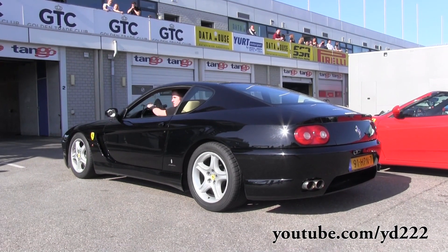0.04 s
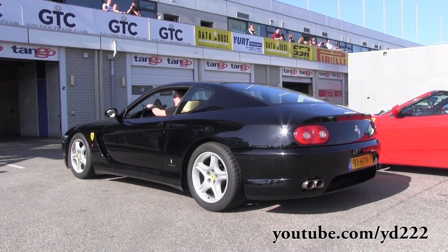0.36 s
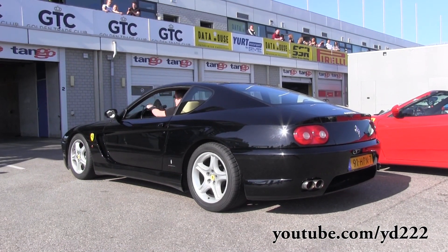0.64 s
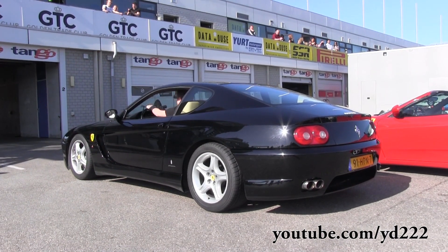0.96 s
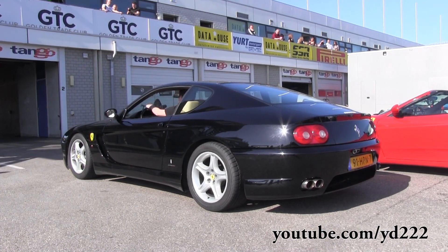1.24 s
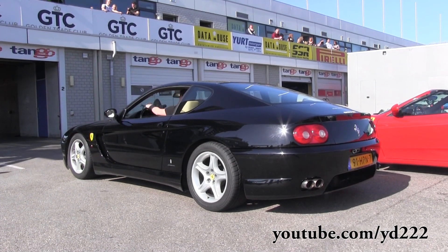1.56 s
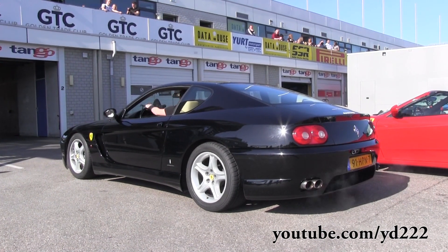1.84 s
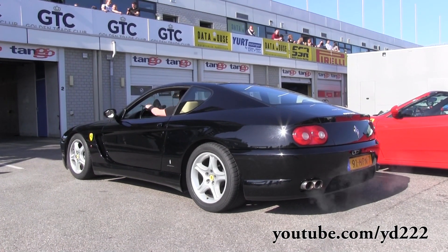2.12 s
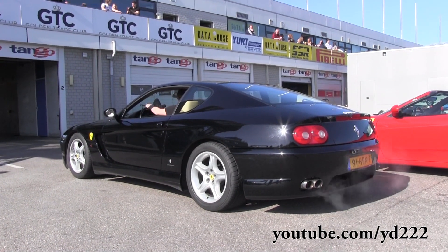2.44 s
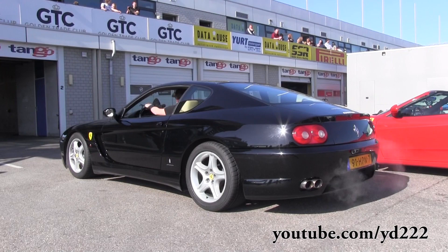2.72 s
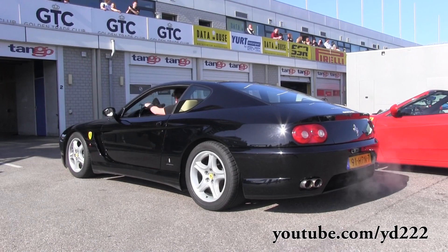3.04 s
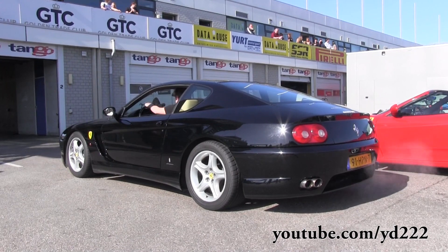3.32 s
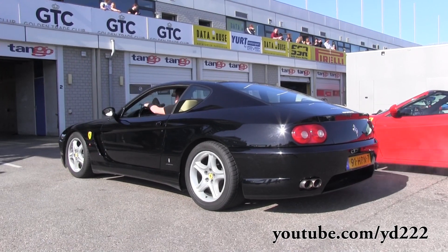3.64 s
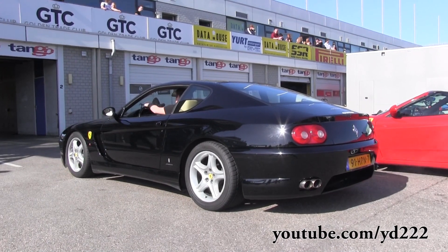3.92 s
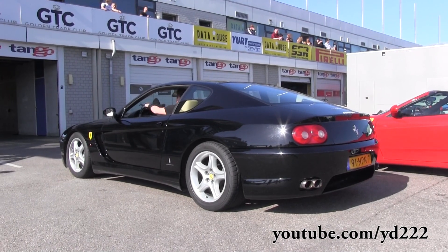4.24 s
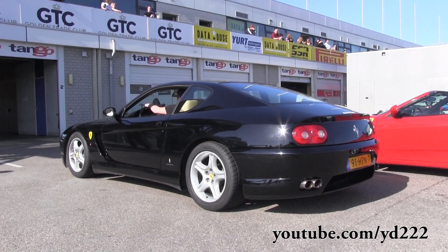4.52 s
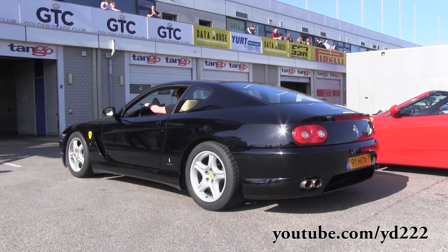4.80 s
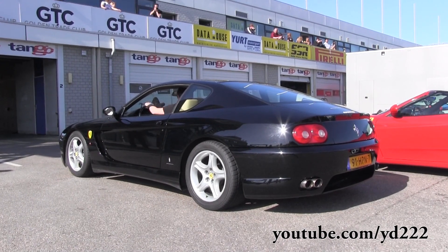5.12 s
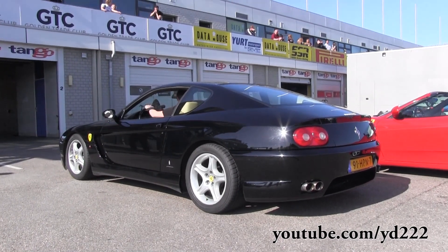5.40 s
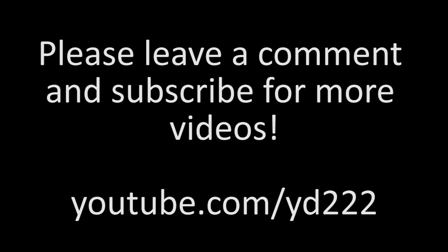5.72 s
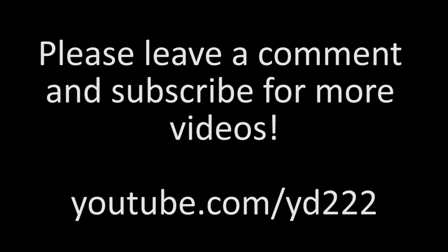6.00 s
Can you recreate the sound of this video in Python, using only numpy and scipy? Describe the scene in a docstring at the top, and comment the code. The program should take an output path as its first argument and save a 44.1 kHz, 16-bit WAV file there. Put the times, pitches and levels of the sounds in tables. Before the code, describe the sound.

A sports car revs once and runs down with exhaust pops, then a closer, lumpy engine idles fast and eases off.

```python
"""A twelve-cylinder sports car is revved once and runs down to idle, rasping and coughing.
Its firings make the exhaust pipe ring, gas rushes out, and unburnt fuel pops in the silencer.
Close by, a lumpy ten-cylinder engine at a fast idle takes over, then eases off and drones.
Both hum in "orders": tones at whole multiples of an engine's cycle or firing rate.
Garage fronts echo, a small double click comes near the end, and the sound stops abruptly."""
import sys
import numpy as np
from scipy import signal
from scipy.fft import rfft, irfft, next_fast_len
from scipy.io import wavfile
from scipy.ndimage import uniform_filter1d, minimum_filter1d, map_coordinates

SR = 44100
rng = np.random.default_rng(int(sys.argv[2]) if len(sys.argv) > 2 else 0)


def persist_wave(psi):
    """Save psi, clipped to +-1, as 16-bit WAV."""
    counts = np.round(np.clip(psi, -1, 1) * 32767).astype(np.int16)
    wavfile.write(sys.argv[1], SR, np.atleast_2d(counts).T)


N = 276066

# How long the echo takes to fade by 60 dB: (frequency [Hz], time [s])
ECHO_FADE = [(100, 0.56), (1000, 0.37), (10000, 0.026)]
# How alike noise is in the two ears: (frequency [Hz], likeness [0-1])
EAR_LIKENESS = [(100, 1), (500, .85), (1000, .82), (2000, .72), (4000, .68), (12000, .7)]
# Two small, hard clicks: (time [s], level [dB])
CLICKS = [(4.923, -38), (4.942, -51)]
# Where each engine sits: (frequency [Hz], left minus right [dB])
LUMPY_SIDE = [(60, -3), (110, -3.5), (200, -3), (380, -3.5), (700, -1), (1290, -1.5), (2380, 1.5),
              (4400, 0.0), (8120, 1), (15000, -2.5)]
CAR_SIDE = [(60, -3), (200, -1.5), (400, -1), (700, -0.5), (1300, 0.5), (2400, 3), (4400, 1.5), (8100, 2),
            (15000, -3)]

# Tone colours, each a list of (frequency [Hz], relative level [dB])
CLICK_COLOUR = [(2500, -28.5), (4200, 2), (6500, -12), (9300, -0.5), (11000, -17.5), (14500, -13.5),
                (16000, -47.5)]
LOADED_COLOUR = [(30, -39.5), (50, -13), (80, -5), (107, -4.5), (135, -2.5), (193, 0.5), (227, -16.5),
                 (260, 0.5), (326, -7), (380, -2.5), (463, -6.5), (680, -31), (900, -32.5), (1300, -67),
                 (2500, -120)]  # the lumpy engine's exhaust, working hard
EASED_COLOUR = [(30, -44.5), (55, -28), (80, -30), (120, -16), (150, -9), (170, -20.5), (205, -7),
                (247, -11), (284, -6), (330, -20.5), (370, -25), (430, -13), (500, -30), (900, -31),
                (1300, -42.5), (2500, -120)]  # the same exhaust, eased off
CHUFF_COLOUR = [(400, -7.5), (600, -2.5), (720, -8.5), (950, -8), (1150, -7), (1300, -11.5), (1580, -11),
                (1660, -9), (1780, -13.5), (1950, -16), (2190, -17), (2600, -20.5), (2820, -17.5),
                (2950, -24.5), (4000, -38), (5500, -61.5), (9000, -120)]  # its gas, middle range
FIZZ_COLOUR = [(2060, -23.5), (3500, 1), (3950, -5), (4280, -2), (4740, -7), (5910, -7.5), (7230, -14),
               (8200, -14), (10700, -20), (14600, -26.5), (15800, -36.5)]  # its gas, treble
BLAST_COLOUR = [(45, -36.5), (90, 0), (150, 0), (300, 3), (420, 1), (600, -5), (850, -30), (2000, -120)]  # the gas a cough throws out
BARK_COLOUR = [(200, -35), (450, -16), (620, -10), (760, -17.5), (900, -15.5), (1200, -14), (1500, -12),
               (2100, -25), (5000, -50.5), (9000, -120)]  # the sports car's silencer
RASP_COLOUR = [(380, -22.5), (650, -9), (770, -8), (900, -7), (1190, -3.5), (1400, -5), (1540, -4),
               (1640, .5), (1760, -5), (1920, -9.5), (2190, -3), (2450, -10.5), (2680, -10), (2820, -4.5),
               (3000, -13.5), (3220, -10), (3900, -15), (4500, -15), (5500, -31), (9000, -120)]  # its exhaust's rough edge
HONK_COLOUR = [(300, -69.5), (800, -26), (1180, -5), (1460, 6), (1750, 1.5), (2100, -6.5), (3200, -38),
               (7000, -120)]  # its pipe mouths with the throttle open
HISS_COLOUR = [(2060, -24), (3500, -11), (4450, -5.5), (4920, -4.5), (6170, -3), (6490, -4.5), (7050, -13),
               (8100, -7.5), (9480, -14), (10700, -12.5), (14600, -24.5), (15200, -26.5), (15800, -32.5)]  # its gas, treble
BURBLE_COLOUR = [(40, -33.5), (90, -10), (140, 4), (300, 3.5), (520, 7), (750, -3.5), (1200, -42),
                 (3000, -120)]  # its gas, bass

# How the lumpy engine runs: (time [s], four-stroke cycle rate [Hz], load [0-1], nearness [dB])
LUMPY_RUN = [(0, 13, 0.86, -15.5), (1.2, 9.5, 1, -19.5), (1.7, 11.6, 0.27, -10.5), (2.0, 11.2, 0.98, -7),
             (2.4, 11.84, 1, -3), (2.7, 12.5, 0.97, 1), (2.9, 12.8, 0.94, 2), (3.25, 13.12, 0.97, 2),
             (3.6, 13.15, 0.99, 0), (3.9, 13.05, 0.94, 1.5), (4.22, 12.85, 0.83, 1),
             (4.35, 12.4, 0.69, 1.5), (4.55, 12.2, .42, 2), (4.68, 11.66, 0.16, 2.5), (4.9, 11.8, 0.05, 1),
             (5.07, 11, 0.11, 2), (5.3, 11.24, 0.05, 2), (5.66, 10.37, 0.05, 3)]
# Its orders: (multiple of the cycle rate, at full load [dB], at half load [dB], eased off [dB])
LUMPY_ORDERS = [(5, -16, -15, -23), (6, -9.5, -20.5, -31), (10, -16, -18, -23.5), (12, -10, -6, -27),
                (14, -10, -20, -7.5), (16, -17.5, -8.5, -11), (20, -9.5, -4, -9), (21, -27, -4, -18),
                (24, -24.5, -11.5, -10), (25, -11.5, -19, -2), (29, -19.5, -23, -17),
                (32, -20.5, -18.5, -20), (36, -11, -22.5, -26), (39, -19, -34.5, -30.5),
                (40, -16.5, -45, -16), (46, -18, -40, -29.5), (57, -26, -40, -34.5)]
# How three of its layers swell and fade: (time [s], relative level [dB])
ORDERS_LEVEL = [(2.95, -6), (3.22, -1)]
BOOM_LEVEL = [(2.5, -34), (2.7, -28), (3.08, -28), (3.3, -17.5), (4.27, -15), (4.38, -30), (4.65, -33),
              (4.9, -39), (5.66, -34)]
GAS_LEVEL = [(2.55, -23), (2.63, -27), (2.95, -25), (3.45, -25.5), (3.55, -26), (4.45, -30), (4.62, -35.5),
             (4.9, -36), (5.35, -37.5), (5.66, -34.5)]
# With each of its surges, one order drones in the silencer:
# (time [s], relative level [dB], half width [s], multiple of the cycle rate)
DRONE_SURGES = [(3.254, -18.5, 0.022, 15), (3.507, -17, 0.023, 15), (3.737, -17, 0.017, 15),
                (4.333, -14.5, 0.041, 13), (4.448, -20, 0.025, 13), (4.524, -16.5, 0.032, 20),
                (4.577, -19, 0.03, 13), (4.713, -14, 0.025, 15), (4.806, -16.5, 0.021, 15),
                (4.945, -8.5, 0.03, 15), (5.054, -15, 0.018, 15), (5.131, -15.5, 0.04, 15),
                (5.236, -15, 0.016, 15), (5.384, -17.5, 0.026, 15), (5.574, -15, 0.015, 15),
                (5.642, -12.5, 0.014, 25)]

# The sports car's coughs: (time [s], boom [dB], half width [s], pitch [Hz], blast [dB])
FUEL_COUGHS = [(0.018, -17, 0.025, 346, -23), (.085, -24.5, 0.031, 166, -25),
               (.155, -24, 0.026, 187, -19.5), (0.474, -18, 0.0058, 407, -14.5),
               (0.551, -10, 0.012, 562, -16.5), (0.605, -26.5, 0.009, 290, -26),
               (0.634, -21, 0.02, 300, -25), (0.724, -19.5, 0.0086, 220, -24),
               (1.137, -17, 0.0062, 300, -12.5), (1.147, -16, 0.0057, 272, -12.5),
               (2.601, -19, 0.015, 85.5, -13), (2.671, -15, 0.011, 278, -17.5),
               (2.703, -18, 0.012, 92, -21), (2.755, -22, .005, 200, -18), (2.791, -25, 0.0046, 78, -19),
               (3.007, -26, 0.0087, 101, -14)]
# Its speed: (time [s], firing rate of one bank of six cylinders [Hz])
CAR_SPEED = [(0, 113.7), (.1, 112.1), (.19, 120), (.26, 137.1), (.4, 171.4), (.46, 182.4), (.51, 179.4),
             (.59, 180.6), (.67, 175.7), (.75, 166.3), (.88, 154.6), (1.04, 141.1), (1.2, 128),
             (1.38, 115.7), (1.66, 97.1), (1.87, 83.3), (2.23, 62.8), (2.5, 48.5), (2.6, 46.8)]
# One quick press of the pedal: (time [s], throttle opening [0-1])
CAR_THROTTLE = [(0, 0), (.05, 0.46), (.12, 0.83), (.21, 1), (.45, 0.6), (.49, 0)]
# It sinks to a quiet idle: (time [s], gain [dB])
CAR_FADE = [(2.53, 0.5), (2.65, -3.5), (3.0, -12), (3.6, -51.5)]
# Its orders: (multiple of the firing rate, relative level [dB])
CAR_ORDERS = [(1, -1), (2, -2), (3, 0), (4, 1.5), (5, -9.5), (6, -11), (8, -5), (10, -14), (13, -12),
              (14, -13)]
# What full throttle does to those orders: (frequency [Hz], gain [dB])
THROTTLE_BOOST = [(90, -7.6), (150, -3.7), (250, 8), (370, 14.5), (450, 9), (550, 11.5), (680, 7.5),
                  (850, -2.7), (1100, 0), (1500, 7), (2100, -1), (2800, -5)]
# Standing waves, the pitches its pipe likes to ring at: (frequency [Hz], half width [Hz], gain [dB])
PIPE_RESONANCES = [(70.4, 7, -21.2), (101.4, 8, -15.3), (123, 9.6, -24), (178.6, 8, -29),
                   (201.5, 12, -20.3), (256, 13, -28), (294, 14, -25.5), (361.5, 20, -29.2),
                   (468, 16, -20.5), (549, 24, -23), (615, 35, -28.5), (736, 17, -33), (904.5, 26, -21.5),
                   (1190, 90, -31), (1500, 120, -28)]

# Rules: (value at CRUISE_HZ with the throttle shut, added by full throttle, added as speed doubles)
CRUISE_HZ = 120
BARK_RULE_DB, RASP_RULE_DB = (-35, 6, 0.92), (-22.5, 3.5, 2.5)
HISS_RULE_DB, BURBLE_RULE_DB = (-35.5, -1, 3.4), (-27, 4.3, -0.88)
PITCHED_RULE = (.55, .15, .08)  # the share of the rasp that repeats with each firing


def amp(db):
    """Turn decibels into a gain."""
    return 10 ** (np.asarray(db) / 20)


def unit(x):
    """Scale a signal to an average (rms) level of 1."""
    return x / np.sqrt(np.mean(x ** 2) + 1e-20)


def along(points, hz):
    """Look up a (frequency, value) table, sliding between its rows by octaves."""
    freqs, values = np.transpose(points)
    return np.interp(np.log(hz + 1), np.log(freqs + 1), values)


def curves(rows):
    """Turn each column after the time into one value per sample."""
    times, *columns = np.transpose(rows)
    return [np.interp(np.arange(N) / SR, times, column) for column in columns]


def wobble(rate):
    """A smooth random curve through `rate` new values a second."""
    return map_coordinates(rng.standard_normal(int(N * rate / SR) + 4), [np.arange(N) * rate / SR])


def bump(at_s, width_s):
    """A bell-shaped swell of height 1 around a moment."""
    return np.exp(-.5 * np.minimum(((np.arange(N) / SR - at_s) / width_s) ** 2, 200))


def filtered(x, response):
    """Turn each frequency up or down by the gain response(hz)."""
    size = next_fast_len(N + SR // 4)
    return irfft(rfft(x, size) * response(np.fft.rfftfreq(size, 1 / SR)), size)[..., :N]


def placed(x, side):
    """Lean a source left or right, by frequency."""
    return filtered(x, lambda hz: amp(np.array([[.5], [-.5]]) * along(side, hz)))


def ring(x, colour, size=8192):
    """Let x ring a hollow body with this tone colour; the result has level 1."""
    cepstrum = irfft(np.log(amp(along(colour, np.fft.rfftfreq(size, 1 / SR))) + 1e-6))
    cepstrum[1:size // 2] *= 2  # folding it puts the ringing after each pulse, never before
    cepstrum[size // 2 + 1:] = 0
    ringing = irfft(np.exp(rfft(cepstrum)))
    return unit(signal.fftconvolve(x, ringing)[:N])


def rush(colour, flow):
    """Rushing stereo noise of level 1 whose strength follows the flow."""
    def response(hz):
        spread = np.arccos(np.clip(along(EAR_LIKENESS, hz), -1, 1)) / 2
        return amp(along(colour, hz)) * np.array([np.cos(spread), np.sin(spread)])
    mid, side = filtered(flow * rng.standard_normal((2, N)), response)
    return unit(np.array([mid + side, mid - side]))


def puffs(phase, depth_db, flutter_db):
    """Gas flow that swells once per turn of the phase and flutters at random."""
    return amp(depth_db * np.cos(2 * np.pi * phase) + flutter_db * wobble(170))


def order_tone(phase, waver_db, smear, rate):
    """One engine order: a tone of level about 1, unsteady in strength and timing."""
    strength = np.sqrt(2) * amp(waver_db * wobble(rate))
    return strength * np.sin(2 * np.pi * (phase + rng.random()) + smear * wobble(rate))


def garage_echo(x):
    """The garage fronts throw the sound back, the treble dying first."""
    hz, t, noise = signal.stft(rng.standard_normal((2, SR // 2)), SR, nperseg=256)
    tail = signal.istft(noise * amp(-60 * t / along(ECHO_FADE, hz)[:, None]), SR, nperseg=256)[1]
    delayed = np.pad(x.mean(axis=0), (700, 0))  # about 16 ms late
    return signal.fftconvolve(delayed[None], tail / np.linalg.norm(tail[0]), axes=1)[:, :N]


def double_click(fade_s=.065):
    """Two bright bursts of noise that start sharply and die fast."""
    t = np.arange(N) / SR
    strikes = sum(amp(db - 60 * np.abs(t - at) / fade_s) * (t > at) for at, db in CLICKS)
    return strikes * rush(CLICK_COLOUR, 1)


def firings(phase, uneven_db, scatter_db, jitter, cylinders):
    """One slightly mistimed pulse per turn of the phase; each cylinder has its own strength."""
    strength = rng.standard_normal(cylinders)
    turns = np.arange(1, int(phase[-1]))
    chance = rng.standard_normal((len(turns), 2))
    at = np.interp(turns + jitter * chance[:, 0], phase, np.arange(N) - .5).clip(0, N - 2)
    size = amp(uneven_db * strength[turns % cylinders] + scatter_db * chance[:, 1])
    i = at.astype(int)  # each pulse is shared between two samples
    return np.bincount(i, size * (1 - at + i), N) + np.bincount(i + 1, size * (at - i), N)


def silencer_drone(phase):
    """One order hums softly all along, and each surge makes one swell in the silencer."""
    orders = sorted({round(k) for *_, k in DRONE_SURGES})
    tones = {k: order_tone(k * phase, waver_db=.7, smear=.15, rate=20) for k in orders}
    hum = amp(-25.5) * tones[round(DRONE_SURGES[0][3])]
    return hum + sum(amp(db) * bump(at, width) * tones[round(k)] for at, db, width, k in DRONE_SURGES)


def lumpy_gas(phase):
    """Escaping gas chuffs and fizzes; the fizz rises and falls further than the chuff."""
    gas_db, = curves(GAS_LEVEL)
    fizz_db = -47 + 1.24 * (gas_db + 29)
    flow = puffs(5 * phase, depth_db=.4, flutter_db=.4)
    return amp(gas_db) * rush(CHUFF_COLOUR, flow) + amp(fizz_db) * rush(FIZZ_COLOUR, flow)


def lumpy_engine(body_db=-16.5, sag_db=-3.5):
    """Ten uneven cylinders ring an exhaust that booms under load and drones as it eases off."""
    def by_load(full_db, half_db, eased_db):
        return amp(np.interp(load, [0, .5, 1], [eased_db, half_db, full_db]))
    cycle_hz, load, near_db = curves(LUMPY_RUN)
    phase = np.cumsum(cycle_hz * (1 + 0.0017 * wobble(14))) / SR
    boom = amp(curves(BOOM_LEVEL)[0]) * order_tone(8 * phase, waver_db=.7, smear=.06, rate=20)
    drone = silencer_drone(phase)
    orders = sum(by_load(*levels) * order_tone(round(k) * phase, waver_db=1.6, smear=.3, rate=12)
                 for k, *levels in LUMPY_ORDERS)
    orders *= amp(curves(ORDERS_LEVEL)[0])
    pulses = firings(10 * phase, uneven_db=3, scatter_db=2, jitter=.2, cylinders=10)
    lumps = by_load(-5, -18, -34) * ring(pulses, LOADED_COLOUR)
    lumps += by_load(-25, -8, -7) * ring(pulses, EASED_COLOUR)
    lumps = filtered(lumps, lambda hz: 1 - 1 / (1 + (hz / 62) ** 4))  # a small pipe gives little bass
    lull = 1 - np.minimum(1, sum(bump(at, width) for at, _, width, _ in DRONE_SURGES))
    body = amp(body_db + sag_db * (1 - load) * lull) * (orders + lumps)  # eased off, it sags in lulls
    return amp(near_db) * (boom + drone + body + lumpy_gas(phase))


def coughs():
    """Unburnt fuel pops in the silencer: each time a short blast of gas and a rough boom."""
    t = np.arange(N) / SR
    ragged = .35 * wobble(150)
    blast = rush(BLAST_COLOUR, 1)
    sound = np.zeros((2, N))
    for at, boom_db, width, hz, blast_db in FUEL_COUGHS:
        boom = np.sqrt(2) * np.cos(2 * np.pi * hz * (t - at) + ragged)
        sound += bump(at, width) * (amp(boom_db) * boom + amp(blast_db) * blast)
    return sound


def pipe_gain(hz):
    """How strongly the pipe's standing waves answer a frequency."""
    grid = np.arange(SR // 16)
    peaks = sum(amp(db) / (1 + ((grid - centre) / width) ** 2) for centre, width, db in PIPE_RESONANCES)
    return np.interp(hz, grid, peaks)


def pipe_tones(bank_hz, phase, throttle, misfire_db=-8, lag_s=.04):
    """Orders swell as they sweep past the pipe's resonances; misfires dip them just after coughs."""
    misfire = np.max([bump(at + lag_s, .011) for at, *_ in FUEL_COUGHS], axis=0) * (1 - throttle) ** 2
    tones = np.zeros(N)
    for k, db in CAR_ORDERS:
        gain = amp(db + throttle * along(THROTTLE_BOOST, k * bank_hz)) * pipe_gain(round(k) * bank_hz)
        tones += gain * order_tone(round(k) * phase, waver_db=1.2, smear=.1, rate=35)
    return amp(misfire_db * misfire) * tones


def pipe_bounce(x, fade_s):
    """Pulses bounce to and fro in the pipe, so each order swells and fades as it sweeps."""
    t = np.arange(SR // 20) / SR
    return signal.fftconvolve(x, rng.standard_normal(len(t)) * amp(-60 * t / fade_s))[:N]


def cylinder_buzz(phase, crank_db, cam_db, spread_db, rate, count=4, size=16384):
    """Six unequal firings a cycle add weaker tones, at crank and cam rates, between the main orders."""
    k = np.arange(size // 24)
    weight_db = np.where(k % 6 == 0, 0, np.where(k % 2 == 0, crank_db, cam_db))
    strengths = amp(weight_db + spread_db * rng.standard_normal((count, len(k))))
    cycles = irfft(strengths * np.exp(2j * np.pi * rng.random(strengths.shape)), size)
    place = phase / 6 % 1 * size
    shares = np.array([wobble(rate) for _ in cycles])  # a drifting blend keeps the tone shifting
    blend = sum(share * np.interp(place, np.arange(size), cycle) for share, cycle in zip(shares, cycles))
    return blend / np.linalg.norm(shares, axis=0)


def sports_car():
    """Speed and throttle shape the exhaust: firings sing, bark and rasp; gas hisses and burbles."""
    def follow(rule):
        return rule[0] + rule[1] * throttle + rule[2] * np.log2(bank_hz / CRUISE_HZ)
    bank_hz, = curves(CAR_SPEED)
    throttle, = curves(CAR_THROTTLE)
    phase = np.cumsum(bank_hz) / SR
    tones = pipe_tones(bank_hz, phase, throttle)
    buzz = cylinder_buzz(phase + .006 * wobble(60), crank_db=-5, cam_db=-8, spread_db=4, rate=9)
    buzz *= np.sqrt(bank_hz)
    bark = amp(follow(BARK_RULE_DB)) * ring(buzz, BARK_COLOUR)
    flow = puffs(phase, depth_db=.5, flutter_db=.2)
    pitched = np.clip(follow(PITCHED_RULE), 0, 1)
    rasp_tone = ring(pipe_bounce(buzz, fade_s=.012), RASP_COLOUR)
    rasp = np.sqrt(pitched) * rasp_tone + np.sqrt(1 - pitched) * rush(RASP_COLOUR, flow)
    honk = ring(buzz, HONK_COLOUR) + .4 * rush(HONK_COLOUR, flow)
    snarl = amp(follow(RASP_RULE_DB)) * (amp(-3 * throttle) * rasp + amp(-4) * throttle * honk)
    hiss = amp(follow(HISS_RULE_DB)) * rush(HISS_COLOUR, flow)
    burble = amp(follow(BURBLE_RULE_DB)) * rush(BURBLE_COLOUR, flow)
    return amp(curves(CAR_FADE)[0]) * (tones + bark + snarl + hiss + burble)


def scene():
    """Both engines with their echo, and the double click without one."""
    engines = placed(sports_car() + coughs(), CAR_SIDE) + placed(lumpy_engine(), LUMPY_SIDE)
    return engines + amp(-16.5) * garage_echo(engines) + double_click()


def record(dry, ceiling_db=-1.5, stop_s=5.682, top_hz=15700):
    """Hold down the loudest peaks, stop abruptly and cut the highest treble."""
    needed = np.minimum(1, amp(ceiling_db) / (np.abs(dry).max(axis=0) + 1e-9))
    gain = uniform_filter1d(minimum_filter1d(needed, size=400), size=300)
    running = np.clip((stop_s - np.arange(N) / SR) / .004, 0, 1)
    return filtered(dry * gain * running, lambda hz: hz < top_hz)


dry = scene()
out = record(dry)
persist_wave(out)
```